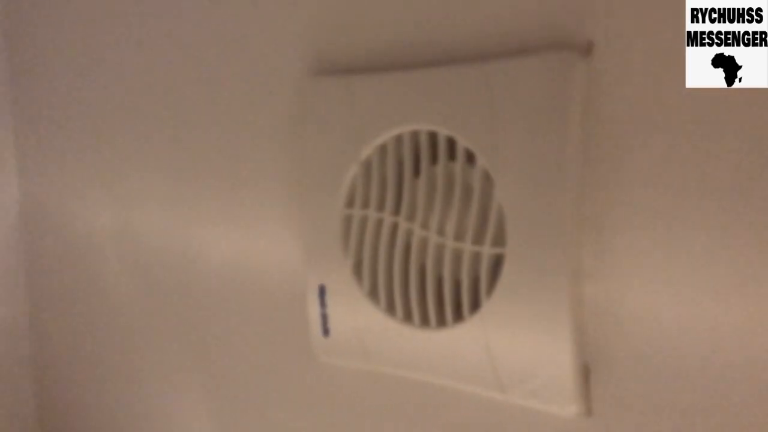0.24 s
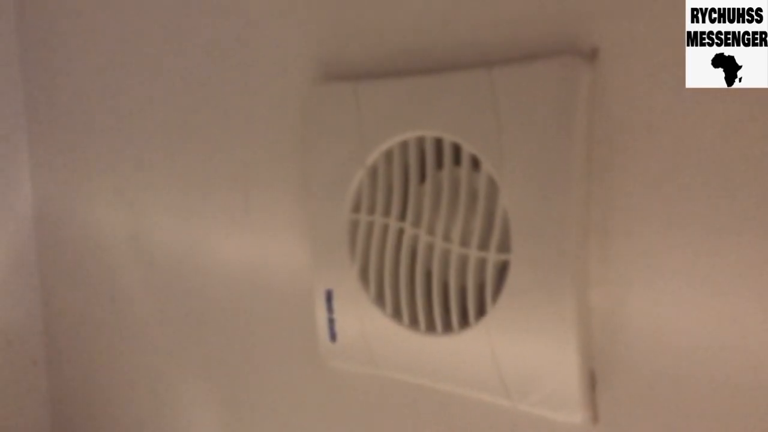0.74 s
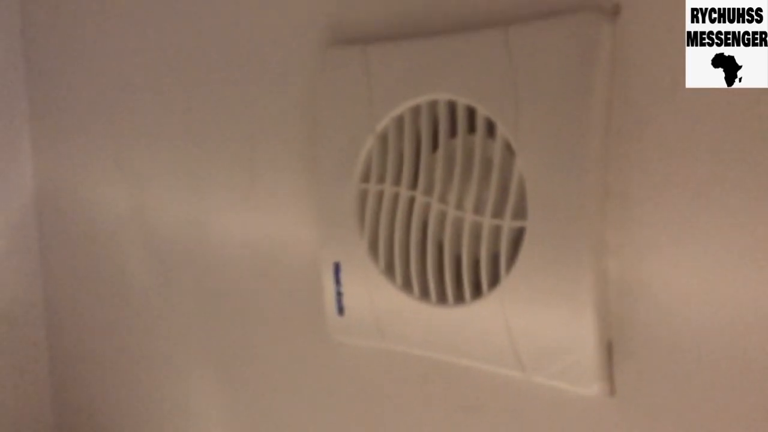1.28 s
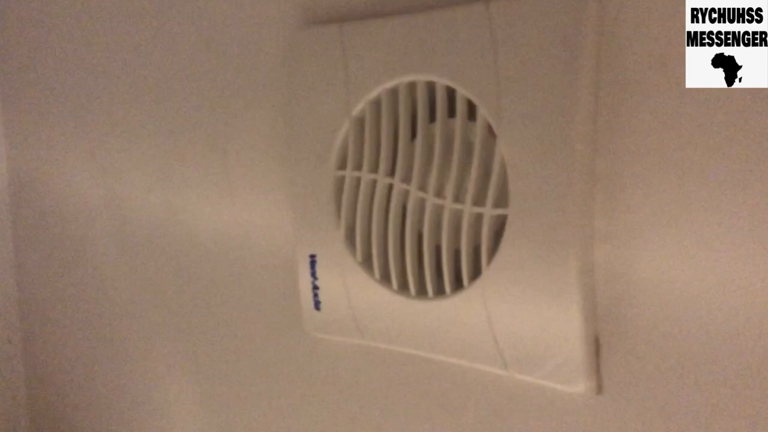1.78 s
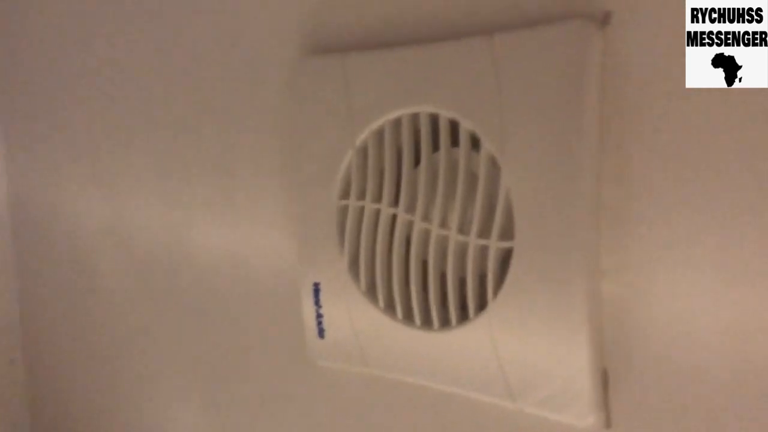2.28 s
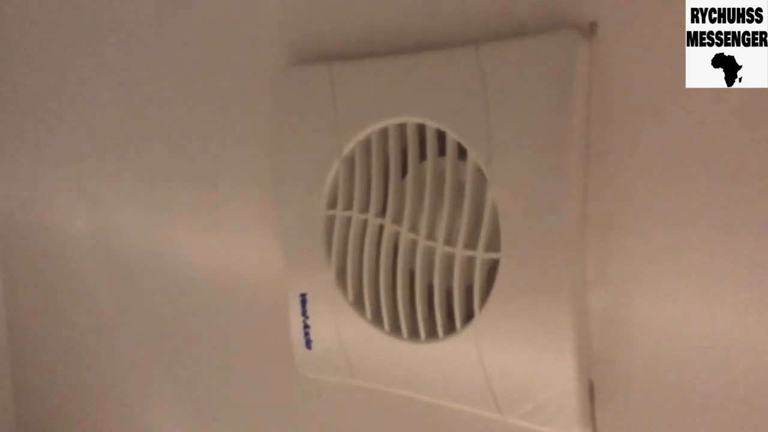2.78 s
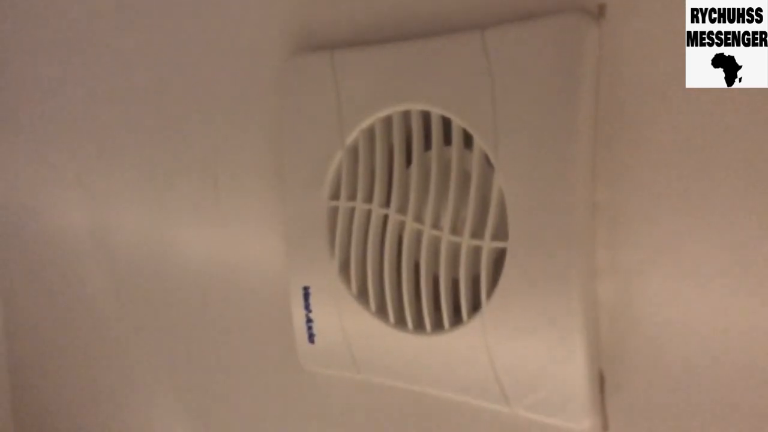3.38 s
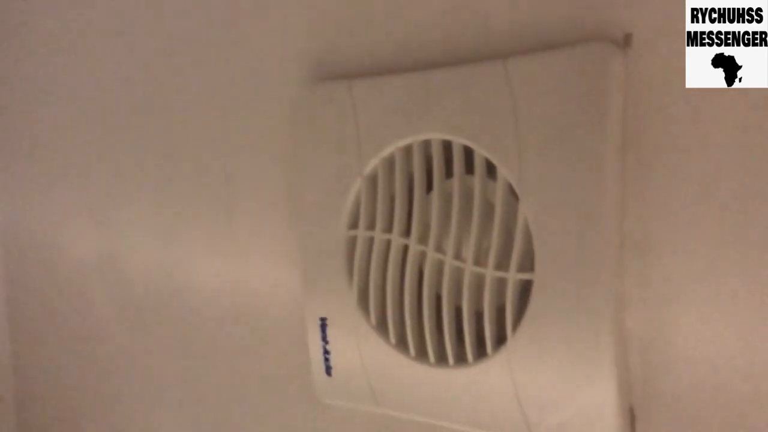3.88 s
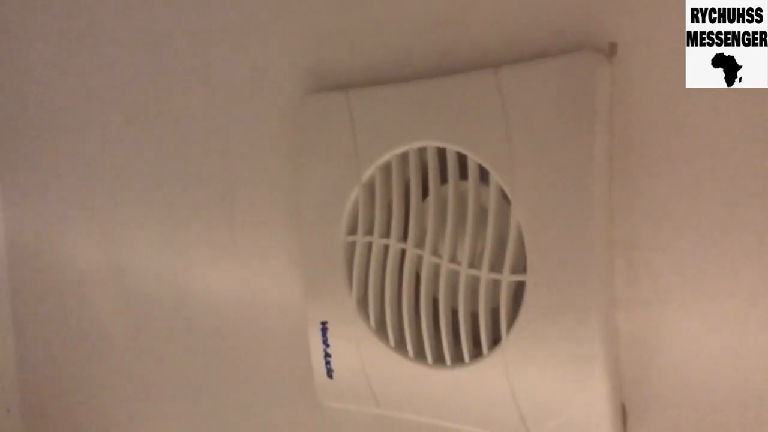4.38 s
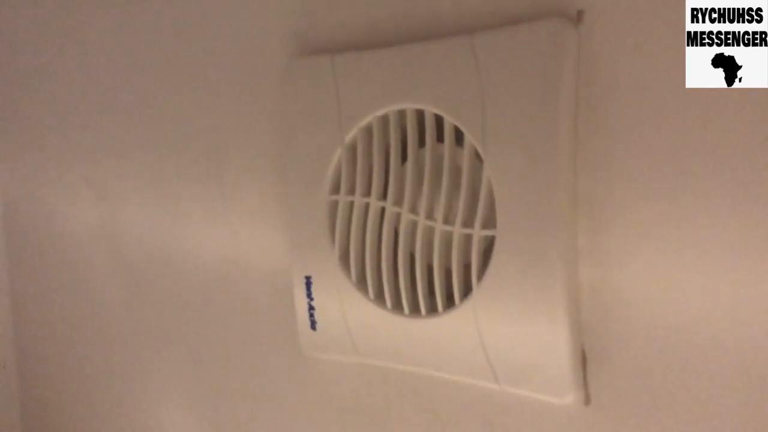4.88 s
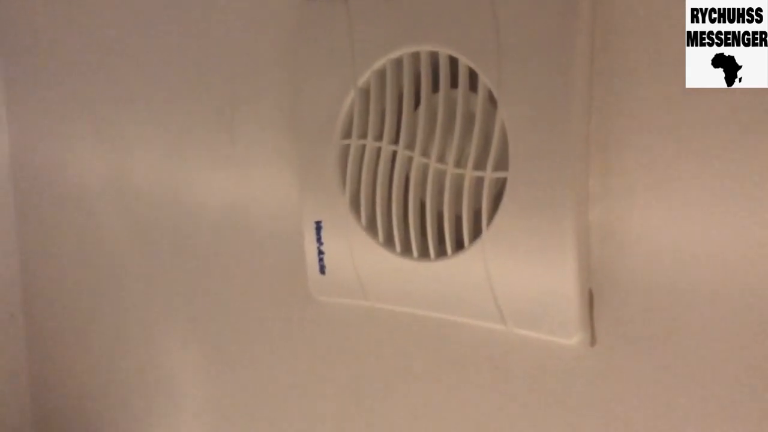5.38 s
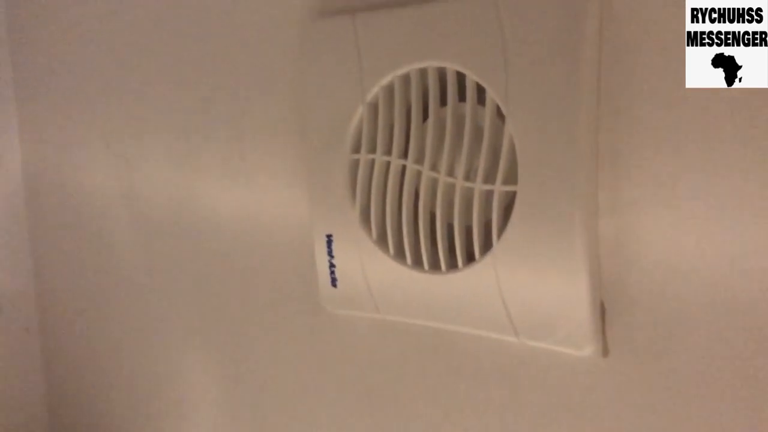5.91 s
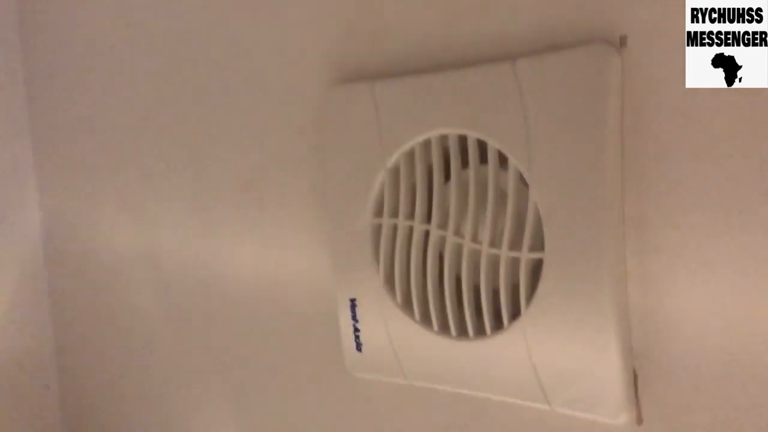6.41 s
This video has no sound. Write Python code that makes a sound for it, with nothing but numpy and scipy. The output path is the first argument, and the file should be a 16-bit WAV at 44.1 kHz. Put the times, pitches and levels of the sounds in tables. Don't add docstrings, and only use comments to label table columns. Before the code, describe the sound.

A small bathroom extractor fan hums low and steady under rushing air, with faint water drips and trickling behind and soft handling thumps.

```python
import sys
import numpy as np
from scipy import signal
from scipy.fft import rfft, irfft, next_fast_len
from scipy.io import wavfile
from scipy.ndimage import uniform_filter1d, map_coordinates

SR = 44100
rng = np.random.default_rng(int(sys.argv[2]) if len(sys.argv) > 2 else 0)


def log_audio(samples):
    frames = np.atleast_2d(samples).T
    limited = np.clip(frames, -1, 1)
    pcm = np.round(limited * 32767).astype(np.int16)
    wavfile.write(sys.argv[1], SR, pcm)


def natural_amplitude(level_db):
    exponent = np.asarray(level_db, float) / 20
    return 10 ** exponent


N = 293265

HUM_HZ = 100.075
# [from/s, to/s]
MOVE_S = (5.198, 5.210)
# [multiple of HUM_HZ, spot 0 level/dB, spot 0 phase/rad, spot 1 level/dB, spot 1 phase/rad]
MOTOR_HUM = [(1, -27.5, 0.72, -26, -0.46), (2, -39, -1.88, -38.5, -3)]
# [f/Hz, spot 0 level/dB, spot 1 level/dB]
BLADE_TONE = (672, -51, -51)
# [f/Hz, density/dB per Hz]
AIR_SPECTRUM = [(20, -48), (40, -19), (70, -11.5), (120, -9), (300, -8), (700, -10), (1500, -15),
                (3000, -22), (5000, -27), (6500, -37), (10000, -40.5), (16000, -58)]
AIR_DB = -37
# [f/Hz, width/Hz, spot 0 gain/dB, spot 1 gain/dB]
RESONANCES = [(144.5, 24.6, 8.5, 9), (181, 26.6, 9.5, 9), (217, 26, -6.5, -3.5), (261, 50, 3.5, 3),
              (309, 61, -3, -5), (430, 41, 6, 3.5), (569, 93, 7, 2), (660, 27, 0.5, 0.5),
              (713, 34, -7.5, -4.5), (939, 60, 4.5, 6), (1125, 130, -2, 2.5), (1200, 47, -4.5, -5.5),
              (1416, 110, 1, 4.5), (1577, 72, -6, -6), (1700, 180, 2.5, 2), (2000, 88, -2.5, -3),
              (2520, 170, 0.5, 1), (2830, 210, 2.5, 2.5), (3080, 190, -1.5, -1.5), (3775, 260, 3.5, 3),
              (4900, 670, 2.5, 1.5), (734, 17, 4.5, 0), (770, 23, 0.5, 2), (1243, 56, 2, 3),
              (2735, 70, -4, -3), (5070, 140, -6.5, -1), (6000, 200, -2, -1), (6860, 200, 1.5, 2),
              (7800, 170, 3.5, 3), (8400, 150, 2, -3)]
# [f/Hz, density/dB per Hz]
TRICKLE_SPECTRUM = [(2000, -39), (4000, -3.5), (6000, 2), (9000, -4.5), (13000, -3.5), (15700, -3),
                    (17000, -22.5)]
# [t/s, hiss level/dB]
TRICKLE_FLOW = [
    (0.0, -54),
    (1.33, -56.5),
    (2.67, -54),
    (3.56, -58.5),
    (4.67, -55),
    (5.39, -57),
    (6.35, -53.5),
    (6.65, -55),
]
# [t/s, level/dB, note f/Hz]
DRIP_EVENTS = [(0.009, -46.5, 5330), (0.09, -46, 5100), (0.212, -58, 6730), (0.444, -52, 5240),
               (0.546, -49.5, 5460), (0.636, -51.5, 5400), (0.859, -45, 5280), (0.949, -51, 5020),
               (1.012, -50, 5030), (1.052, -52, 7000), (1.328, -50, 4800), (1.441, -53, 4830),
               (2.242, -51, 6960), (2.283, -50, 4900), (2.366, -48.5, 3400), (2.454, -55, 5590),
               (2.821, -52.5, 8370), (4.017, -51, 5220), (4.124, -47, 4210), (4.241, -52, 5070),
               (4.432, -51, 5520), (5.094, -60, 6970), (5.522, -49, 5870), (5.775, -49, 3420),
               (5.892, -50, 4640), (6.104, -49.5, 3200), (6.111, -49.5, 6790), (6.184, -51, 3860),
               (6.213, -50, 8400), (6.266, -50.5, 5390)]
# [t/s, level/dB, centre f/Hz, width/Hz]
SPLASH_EVENTS = [(0.332, -50, 7490, 3700), (0.366, -56, 13920, 1600), (0.578, -55, 12400, 3700),
                 (0.861, -58, 11000, 3500), (0.93, -54, 11700, 3000), (1.35, -52, 15110, 800),
                 (1.351, -48, 11200, 4500), (1.533, -54, 13360, 3000), (1.827, -49, 12780, 13000),
                 (1.978, -54, 14840, 1300), (2.528, -54, 12330, 2000), (2.583, -48, 10000, 6000),
                 (2.744, -53, 5690, 3000), (2.853, -55.5, 14810, 1600), (3.14, -55, 13990, 2400),
                 (3.239, -57, 14540, 2300), (3.342, -55, 14590, 2300), (3.709, -48, 12430, 7600),
                 (3.971, -49, 12720, 7300), (4.6, -53, 13980, 1700), (4.75, -54, 11500, 5000),
                 (5.033, -56, 9000, 4000), (5.439, -52, 13620, 5600), (5.667, -52, 9500, 8000),
                 (5.868, -49, 10000, 12000), (6.163, -42.5, 7160, 4000), (6.165, -51, 13500, 4000),
                 (6.215, -53, 9500, 5000), (6.38, -53, 11000, 6000), (6.455, -54, 12000, 4500)]
# [t/s, level/dB, f/Hz, pitch rise/share, life/s]
PIPE_BUBBLES = [
    (6.205, -40, 810, .045, .1),
    (6.25, -43, 885, .005, .06),
    (6.29, -39, 795, -.005, .075),
]
# [t/s, level/dB, f/Hz, rise/s]
HAND_BUMPS = [(0.4738, -46.2, 75, 0.0186), (1.7901, -26.0, 81, 0.0062), (1.8497, -31.4, 75, 0.0075),
              (2.2659, -24.3, 83, 0.0054), (2.4418, -29.2, 78, 0.0056), (2.5789, -34.0, 81, 0.0057),
              (3.032, -35.7, 114, 0.0043), (3.3781, -24.5, 131, 0.0126), (3.3927, -19.9, 92, 0.0057),
              (3.4273, -30.4, 67, 0.0089), (5.6617, -46.0, 87, 0.0188), (6.2773, -46.0, 60, 0.0175),
              (6.3195, -49.0, 77, 0.02)]
ECHO_DB, TILE_T60_S, ECHO_RISE_S = 4.5, 0.17, 0.003


def motor(t, moved):
    turn = 2 * np.pi * HUM_HZ * t
    hum = np.zeros(N)
    for k, db_0, phase_0, db_1, phase_1 in MOTOR_HUM:
        hum += (1 - moved) * natural_amplitude(db_0) * np.cos(k * turn + phase_0)
        hum += moved * natural_amplitude(db_1) * np.cos(k * turn + phase_1)
    hz, db_0, db_1 = BLADE_TONE
    blade_db = db_0 + moved * (db_1 - db_0) + 1.27 * wobble(5.4)
    blade = natural_amplitude(blade_db) * np.cos(2 * np.pi * hz * t + 0.51 * wobble(4))
    return np.sqrt(2) * (hum + blade)


def air(moved):
    mode_knots = rng.standard_normal((2, 1200))
    turbulence = patchy(patchy_db=0.5, bins=6)

    def gain_db(f, spot):
        ripple_db = 1.4 * map_coordinates(mode_knots[spot], [f / 20]) * np.clip((f - 230) / 900, 0, 1)
        return along(AIR_SPECTRUM, f) + room_db(f, spot) + ripple_db

    spot_0 = unit(coloured(turbulence, lambda f: gain_db(f, 0)))
    spot_1 = unit(coloured(turbulence, lambda f: gain_db(f, 1)))
    level_db = AIR_DB + 0.43 * wobble(1.03) + 0.14 * wobble(7.1)
    return natural_amplitude(level_db) * ((1 - moved) * spot_0 + moved * spot_1)


def trickle(t):
    hiss = coloured(patchy(patchy_db=2.2, bins=60), lambda f: along(TRICKLE_SPECTRUM, f) + room_db(f, 0))
    return natural_amplitude(np.interp(t, *np.transpose(TRICKLE_FLOW))) * unit(hiss)


def drips():
    sharpness, impact_db, note_db = 6.6, -9, -2
    out = np.zeros(N)
    for s, db, hz in DRIP_EVENTS:
        level_db = db + ECHO_DB
        add(out, s, natural_amplitude(level_db) * echoing(hz, hz / sharpness))
        add(out, s, natural_amplitude(level_db + impact_db) * echoing(hz=11500, width_hz=14000))
        add(out, s, natural_amplitude(level_db + note_db) * bubble(hz, climb=0.11, life_s=32 / hz))
    return out


def splashes():
    out = np.zeros(N)
    for s, db, hz, width_hz in SPLASH_EVENTS:
        add(out, s, natural_amplitude(db + ECHO_DB) * echoing(hz, width_hz))
    return out


def faint_drops():
    out = np.zeros(N)
    for when, pitch, size in rng.random((170, 3)):
        hz = 2600 * 5.5 ** pitch
        level_db = -58.5 + 7 * size - 9 * pitch
        add(out, when * N / SR, natural_amplitude(level_db) * echoing(hz, hz / (3 + 9 * size), t60_s=0.18))
    return out


def spray():
    out = np.zeros(N)
    for when, pitch, size in rng.random((80, 3)):
        hz = 6500 * 2.2 ** pitch
        add(out, when * N / SR, natural_amplitude(-59.5 + 6.5 * size) * echoing(hz, hz / 2.3))
    return out


def gurgle():
    out = np.zeros(N)
    for s, db, hz, climb, life_s in PIPE_BUBBLES:
        add(out, s, natural_amplitude(db) * bubble(hz, climb, life_s))
    return out


def hand():
    out = np.zeros(N)
    t = np.arange(SR // 8) / SR
    for s, db, hz, rise_s in HAND_BUMPS:
        u = t / rise_s
        swing = np.sin(2 * np.pi * hz * (1.2 * t - 4 * t * t))
        add(out, s, natural_amplitude(db) * u * np.exp(1 - u) * swing)
    return out


def bubble(hz, climb, life_s):
    u = np.arange(round(life_s * SR)) / (life_s * SR)
    cycles = hz * life_s * (u + climb * (u * u / 2 - u / 2))
    return np.sin(np.pi * u ** 0.58) * np.sin(2 * np.pi * cycles)


def echoing(hz, width_hz, t60_s=TILE_T60_S):
    t = np.arange(SR // 4) / SR
    ring = coloured(rng.standard_normal(len(t)),
                    lambda f: -20 * np.log10(1 + (2 * (f - hz) / width_hz) ** 2))
    return unit(ring) * natural_amplitude(-60 * t / t60_s) * (1 - np.exp(-t / ECHO_RISE_S))


def room_db(f, spot):
    return sum(row[2 + spot] * np.exp(-2 * ((f - row[0]) / row[1]) ** 2) for row in RESONANCES)


def patchy(patchy_db, bins):
    z = signal.stft(rng.standard_normal(N + 512), nperseg=512)[2]
    field = uniform_filter1d(rng.standard_normal(z.shape), size=bins, axis=0)
    field = uniform_filter1d(field, size=5, axis=1)
    return signal.istft(z * natural_amplitude(patchy_db * unit(field)), nperseg=512)[1][:N]


def coloured(x, gain_db):
    m = next_fast_len(len(x) + 8192)
    return irfft(rfft(x, m) * natural_amplitude(gain_db(np.fft.rfftfreq(m, 1 / SR))), m)[:len(x)]


def along(points, hz):
    f, v = np.transpose(points)
    return np.interp(np.log(hz + 1), np.log(f + 1), v)


def wobble(rate_hz):
    knots = rng.standard_normal(int(N * rate_hz / SR) + 4)
    return map_coordinates(knots, [np.arange(N) * rate_hz / SR])


def unit(x):
    return x / np.sqrt(np.mean(x ** 2) + 1e-20)


def add(out, s, x):
    part = out[max(round(s * SR), 0):][:len(x)]
    part += x[:len(part)]


def scene():
    t = np.arange(N) / SR
    from_s, to_s = MOVE_S
    moved = np.clip((t - from_s) / (to_s - from_s), 0, 1)
    fan = motor(t, moved) + air(moved)
    water = trickle(t) + drips() + splashes() + faint_drops() + spray() + gurgle()
    return (fan + water + hand())[None]


def band_limit(x):
    return signal.sosfilt(signal.butter(12, 16040, fs=SR, output="sos"), x)


def record(dry):
    comb_knots = rng.standard_normal(300)

    def gain_db(f):
        comb_db = 1.3 * map_coordinates(comb_knots, [f / 90]) * (f > 5300)
        bass_db = -10 * np.log10(1 + (38 / (f + 1)) ** 4)
        top_db = -90.0 * (f > 15730)
        return comb_db + bass_db + top_db

    mix = coloured(dry[0], gain_db)[None]
    return band_limit(mix)


dry = scene()
out = record(dry)
log_audio(out)
```